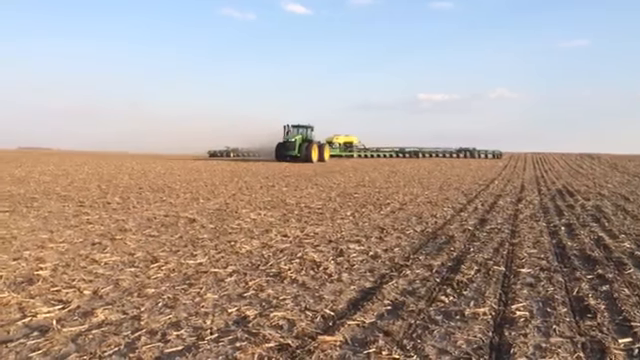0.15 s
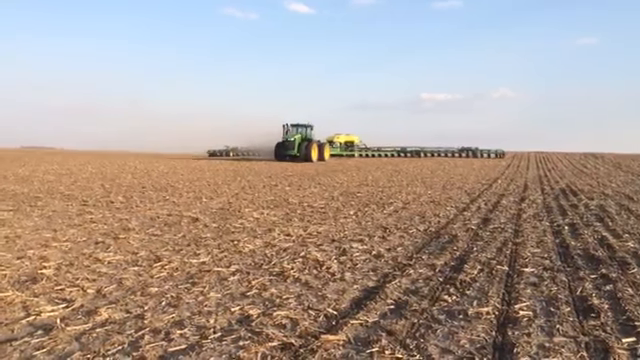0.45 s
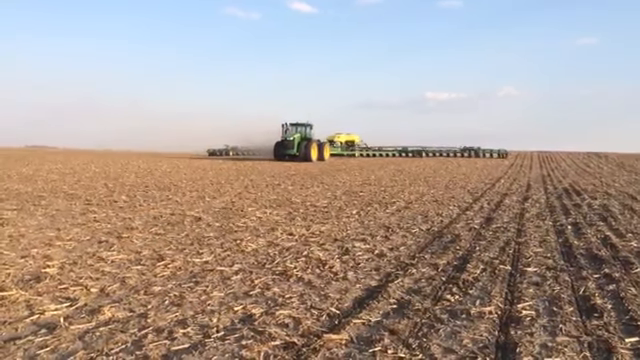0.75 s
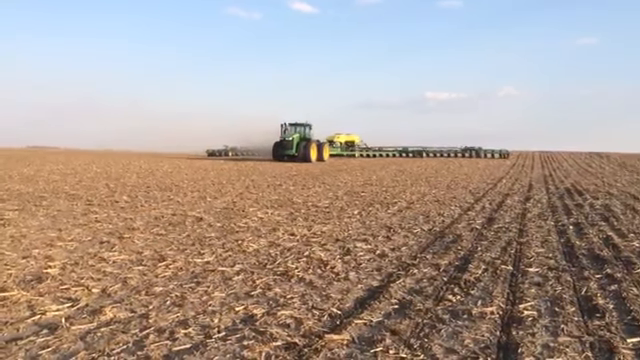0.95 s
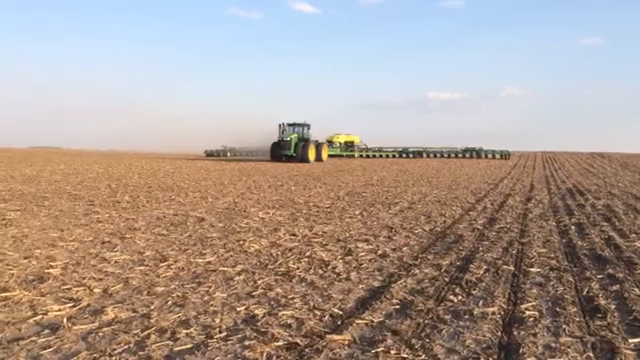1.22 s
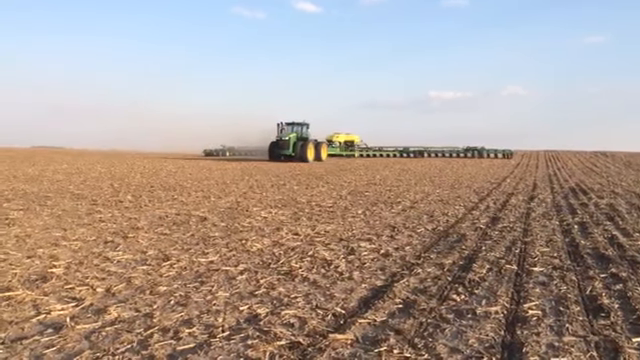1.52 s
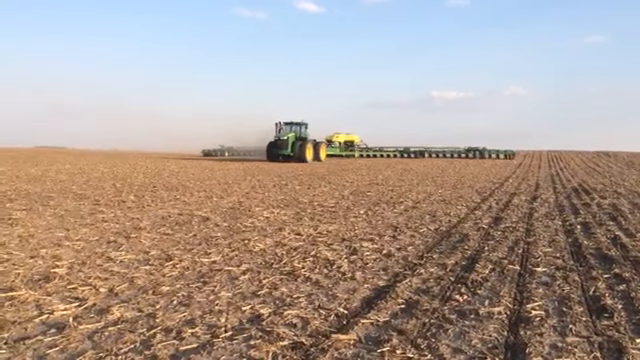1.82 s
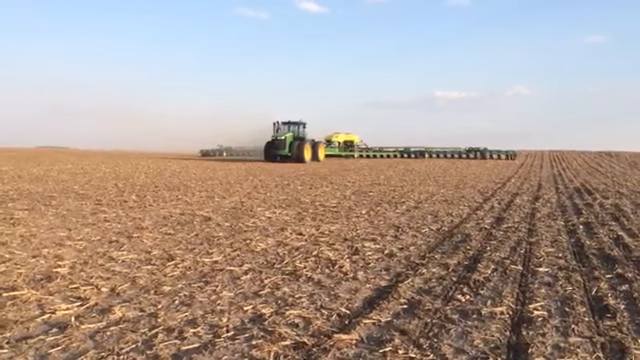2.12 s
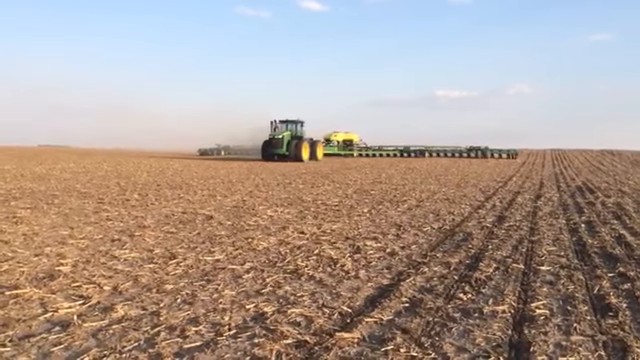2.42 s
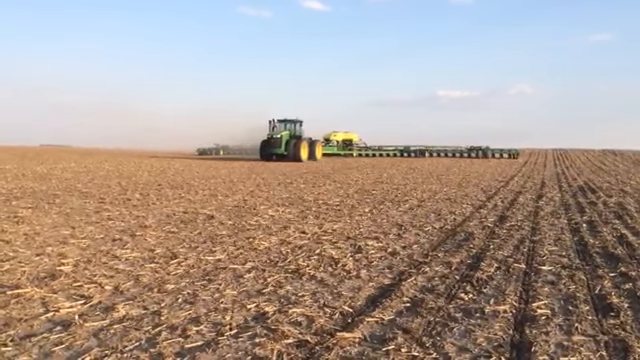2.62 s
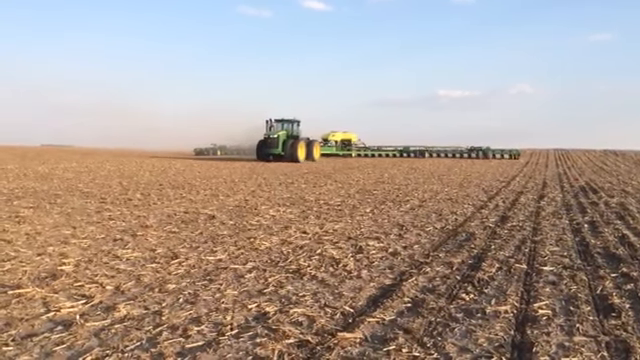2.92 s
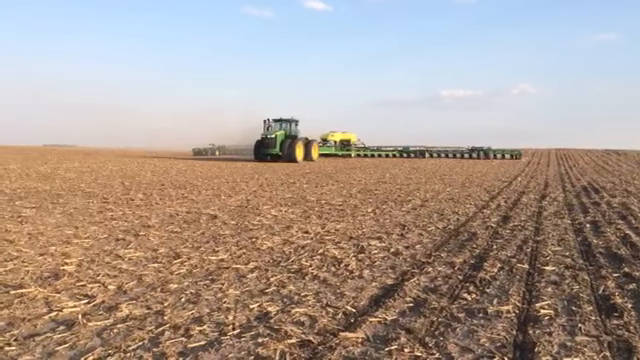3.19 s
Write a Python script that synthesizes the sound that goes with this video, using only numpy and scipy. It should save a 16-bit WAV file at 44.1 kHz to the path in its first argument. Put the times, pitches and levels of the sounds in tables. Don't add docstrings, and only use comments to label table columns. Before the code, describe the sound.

A tractor pulling a planter drones far off over an open field, with a steady mid-pitched whine and hushed roar; close wind thumps and flutters irregularly on a small microphone throughout, with faint squeaks.

```python
import sys
import numpy as np
from scipy import signal
from scipy.io import wavfile
from scipy.ndimage import uniform_filter1d

SR = 44100
rng = np.random.default_rng(int(sys.argv[2]) if len(sys.argv) > 2 else 0)


def output_pcm(signal):
    pcm = np.clip(np.atleast_2d(signal).T, -1, 1) * 32767
    wavfile.write(sys.argv[1], SR, np.round(pcm).astype(np.int16))


def linear_from_db(decibels):
    return 10 ** (np.asarray(decibels, float) / 20)


N = 147735

# [f/Hz, density/dB per Hz]
ROAR = [(300, -10), (750, -1), (1400, -3), (2400, -12.5), (3500, -15.5), (6300, -24), (11200, -40.5),
        (12400, -46.5)]
# [t/s, level/dB]
NEARNESS = [(0, -48), (.7, -46.5), (1.1, -47.5), (2.05, -45.5), (2.35, -47), (2.8, -44), (3.35, -46)]
# [f/Hz, share]
SOIL_ECHO = [(490, 0.41), (1500, 0.16), (2620, 0.66), (4800, 0.16), (10000, 0.098)]
ROAR_DB, NEAR_REF_DB, TREBLE_HZ = -35, -44, 3800
NOTCH_HZ, NOTCH_SPACING_HZ = 2632, 2230

# [f/Hz, width/Hz, level/dB]
GEAR_TONES = [(932, 10, -54), (1030, 8, -51), (1084, 8, -51), (1226, 12, -53), (1395, 25, -50),
              (1868, 12, -59), (4660, 35, -70), (5131, 40, -67), (5600, 65, -69), (1340, 160, -48),
              (2150, 200, -54), (2400, 130, -60), (3200, 300, -58)]
# [t/s, level/dB]
FAN_LOAD = [(0, -52), (.2, -55), (1.15, -56), (1.3, -51), (1.6, -50), (2.0, -54), (2.12, -47.5),
            (2.9, -50.5), (3.35, -53)]
FAN_HZ, FAN_WIDTH_HZ = 2028, 14

# [t/s, peak level/dB, f/Hz]
SQUEAKS = [(.205, -45, 5120), (.235, -43, 5160), (.36, -43, 5110), (.595, -40, 5150), (.62, -42, 5600),
           (.79, -47, 5130), (1.165, -43, 5130), (1.23, -42, 5130), (1.34, -44, 4650), (1.42, -46, 5900),
           (1.555, -43, 5920), (1.615, -46, 5900), (1.733, -40, 5200), (1.975, -39, 4960),
           (1.98, -39, 5130), (2.025, -40, 5130), (2.045, -40, 5130), (2.12, -41, 5080), (2.215, -49, 5600)]
SQUEAK_S, SQUEAK_DB = .008, -9.5

# [t/s, f/Hz, level/dB]
PUMP = [(0.0, 1429, -41), (0.1, 1432, -39), (.3, 1434, -38), (1.6, 1435, -38), (1.9, 1434.5, -40),
        (2.9, 1435, -39.5), (3.35, 1436, -41)]
# [t/s, depth/dB]
WHINE_FADES = [
    (.265, -12),
    (.69, -20),
    (.87, -10),
    (1.85, -8),
    (2.52, -11),
    (2.83, -9),
    (3.14, -11),
    (3.27, -10),
]
LOW_PARTIAL_DB, THIRD_PARTIAL_DB, PUMP_WAVER_DB = 1.3, -25, .95
FADE_HALF_S = .009

# [t/s, peak level/dB, swirl f/Hz]
THUMPS = [(0.013, -21, 110), (0.078, -21, 88), (0.262, -16.5, 101), (0.367, -16.5, 91.5),
          (0.442, -18, 84.5), (0.496, -19, 102), (0.775, -16, 119), (0.947, -19, 129), (0.965, -18, 130),
          (0.979, -14, 194), (1.256, -20, 148), (1.43, -18, 117), (1.443, -23, 100), (1.656, -18.5, 88),
          (1.67, -24.5, 166), (1.99, -23, 137), (2.035, -18, 201), (2.044, -19, 128), (2.054, -16.5, 193),
          (2.138, -21, 91), (2.188, -19, 100.3), (2.275, -16, 179), (2.453, -20, 95), (2.794, -21, 195),
          (2.876, -23, 126), (2.943, -22.5, 84.4), (2.998, -23, 109.1), (3.12, -11, 149),
          (3.134, -17.5, 90.5), (3.189, -22, 139)]
# [t/s, peak level/dB, swirl f/Hz]
FLUTTERS = [(0.047, -18.5, 410), (0.074, -21.5, 236), (0.412, -19, 295), (0.435, -17, 490),
            (0.437, -17, 227), (0.647, -10, 374), (0.657, -15.5, 337), (0.812, -16.5, 205),
            (0.857, -17.5, 226), (0.864, -16, 467), (0.976, -21.5, 480), (1.014, -18, 377),
            (1.256, -13, 540), (1.352, -20.5, 225), (1.522, -17.5, 218), (1.622, -13, 357),
            (1.668, -16.5, 520), (1.678, -14, 430), (1.747, -18.5, 407), (1.812, -20.5, 292),
            (1.999, -16.5, 445), (2.071, -22, 487), (2.221, -19.5, 355), (2.945, -19.5, 467),
            (3.074, -20.5, 357), (3.117, -19, 390), (3.127, -15.5, 505), (3.132, -19.5, 219)]
# [t/s, peak level/dB, swirl f/Hz]
PUFFS = [(0.535, -19.5, 108), (0.649, -25, 162), (0.723, -18.5, 196), (0.727, -19, 467), (0.742, -27, 200),
         (0.802, -21, 148), (0.84, -29, 149), (0.925, -21.5, 104), (0.98, -16, 390), (1.018, -22.5, 182),
         (1.056, -27, 79), (1.516, -21, 64.6), (1.539, -22, 364), (1.629, -21, 144), (1.673, -24, 444),
         (1.68, -19, 163), (1.751, -23, 175), (1.761, -24, 147), (1.923, -24.5, 136), (2.065, -19, 477),
         (2.139, -22, 336), (2.284, -20.5, 525), (2.316, -24.5, 86), (2.402, -23.5, 76),
         (2.444, -19.5, 377), (2.54, -24, 154), (2.662, -22.5, 576), (2.667, -25.5, 95), (2.708, -21, 125),
         (2.755, -24, 109)]
# [t/s, peak level/dB, swirl f/Hz]
MORE_EDDIES = [(0.159, -23, 119), (0.244, -26, 405), (.41, -21, 585), (0.545, -25, 250), (.659, -17.5, 610),
               (0.706, -25, 370), (0.994, -26, 286), (1.084, -28.5, 222), (1.13, -25.5, 384), (1.284, -24, 160),
               (1.355, -23, 112), (1.47, -21.5, 593), (1.885, -25, 123), (2.207, -24, 83), (2.569, -20.5, 490),
               (2.591, -22, 107), (2.618, -25, 124), (2.99, -21.5, 635), (3.022, -20, 113), (3.303, -32, 276)]
# [t/s, peak level/dB, swirl f/Hz]
ROLLS = [(.533, -27, 70), (.567, -32, 71), (.743, -33, 71), (.945, -26, 70), (1.306, -33.5, 75),
         (1.691, -25, 65.3), (1.751, -23, 70), (2.09, -26, 75.5), (2.251, -39, 70), (2.828, -30, 70),
         (2.865, -26, 75.4), (2.905, -29, 75), (3.288, -30, 81), (.673, -23, 160), (.836, -23, 175),
         (1.882, -27, 160), (2.016, -27, 160), (2.923, -26, 166), (3.247, -24.5, 150)]
# [t/s, peak level/dB, swirl f/Hz]
FLICKS = [(.779, -21.5, 281), (1.258, -22, 850), (2.661, -29, 850), (3.345, -25, 456), (.914, -32, 300),
          (1.095, -30, 335), (1.158, -30, 306), (1.328, -27, 304), (2.341, -27, 324), (2.399, -28, 274),
          (2.49, -25.5, 296), (2.906, -25.5, 258), (3.309, -27, 290), (.077, -27, 480), (.531, -29, 510),
          (1.052, -37, 500), (1.145, -29, 473), (2.607, -24, 450), (2.62, -28.5, 660), (2.659, -25, 624),
          (2.789, -30, 446), (3.196, -26, 450), (3.303, -24.5, 524)]
# [t/s, level/dB]
BREEZE = [(0, -28.5), (.19, -37), (.5, -33.5), (.6, -33.5), (.85, -31.5), (1.1, -32), (1.2, -30.5),
          (1.39, -33.5), (1.5, -31), (1.58, -31.5), (1.7, -31.5), (1.94, -32.5), (2.14, -30), (2.36, -32),
          (2.7, -31.5), (2.84, -30.5), (3.0, -29), (3.35, -34)]
# [swirl f/Hz, level/dB]
SMALL_EDDIES = [(40, -19.5), (70, 3), (110, -1), (180, 2), (300, -5), (450, -3.5), (620, 1)]
# [t/s, depth/dB]
LULLS = [(.135, -3), (.195, -4), (.36, -2), (.6, -6), (.89, 2.5), (1.115, -3), (1.2, -4), (1.385, -5),
         (1.57, -4), (1.845, 0), (2.365, -5.5), (2.48, -5), (2.515, 1.5), (2.68, -2.5), (2.835, -10),
         (3.225, -5.5), (3.265, -4)]
SMALL_DB, SMALL_PER_S, SMALL_SPREAD_DB = 0.5, 520, 1.04
CLUMP_DB, LULL_HALF_S = 0.5, .018
WAKE_S, WAKE_SHARE, CALM_DB = 0.016, 0.24, -34
EDDY_TURNS, QUICK_LONGER = .5, .3
GLIDE = .3

LOW_CUT_HZ, FADE_IN_S = 28, .004


def evened(x):
    return x / np.sqrt(np.mean(x ** 2) + 1e-20)


def read(points, hz):
    f, value = np.transpose(points)
    return np.interp(np.log(hz + 1), np.log(f + 1), value)


def curve(table, t, axis=1):
    columns = np.transpose(table)
    return np.interp(t, columns[0], columns[axis])


def dips(rows, half_s, t):
    return sum(db * np.exp(-.5 * ((t - s) / half_s) ** 2) for s, db in rows)


def wander(t, top_hz):
    coarse = np.linspace(0, t[-1], num=1000)
    rates = np.geomspace(top_hz / 20, top_hz, num=16)
    slow = sum(np.sin(2 * np.pi * (f * coarse + rng.random())) / np.sqrt(f) for f in rates)
    return np.interp(t, coarse, evened(slow))


def swirl(hz, width_s, turn, glide=0.):
    t = np.arange(-2048, 2049) / SR
    bell = np.exp(-.5 * (t / width_s) ** 2)
    turns = hz * t * (1 + .5 * glide * t / width_s) + turn
    return bell * np.cos(2 * np.pi * turns)


def scatter(rows, width_of, glide=0.):
    out = np.zeros(N + 4097)
    for s, db, hz in rows:
        turn, slide = rng.random(2)
        at = round(s * SR)
        out[at:at + 4097] += linear_from_db(db) * swirl(hz, width_of(hz), turn, glide * (2 * slide - 1))
    return out[2048:2048 + N]


def roar():
    frames, hz = N // 128 + 5, np.fft.rfftfreq(512, 1 / SR)
    t = np.arange(frames) * 128 / SR
    real, imaginary, patches = rng.standard_normal((frames, len(hz), 3)).T
    patches = uniform_filter1d(patches, size=6, axis=0)
    patches = evened(uniform_filter1d(patches, size=24, axis=1))
    treble = (hz / (hz + TREBLE_HZ))[:, None]
    nearness_db = 2.1 * (curve(NEARNESS, t) - NEAR_REF_DB)
    flicker_db = 0.5 * wander(t, 40)
    field_db = read(ROAR, hz)[:, None] + 1.16 * patches + treble * (nearness_db + flicker_db)
    notch_hz = NOTCH_HZ * (1 + 0.01 * wander(t, 1.8))
    share = np.clip(read(SOIL_ECHO, hz), 0, 1)[:, None]
    comb = 1 - share * np.exp(-2j * np.pi * (hz[:, None] - notch_hz) / NOTCH_SPACING_HZ)
    spectrum = (real + 1j * imaginary) * linear_from_db(field_db) * comb
    noise = signal.istft(spectrum, nperseg=512, noverlap=384)[1][:N]
    return linear_from_db(ROAR_DB) * evened(noise)


def gears():
    t, out = np.arange(N) / SR, np.zeros(N)
    fan = (FAN_HZ, FAN_WIDTH_HZ, curve(FAN_LOAD, t))
    for hz, width, db in [*GEAR_TONES, fan]:
        pole = np.exp(-np.pi * width / SR)
        fuzz = rng.standard_normal((N, 2)) @ [1, 1j]
        for _ in range(2):
            fuzz = signal.lfilter([1], [1, -pole], fuzz)
        tone = (fuzz * np.exp(2j * np.pi * hz * t)).real
        out += linear_from_db(db + 1.3 * wander(t, 3.1)) * evened(tone)
    return out


def squeaks():
    rows = [(s + SQUEAK_S, db, hz) for s, db, hz in SQUEAKS]
    return linear_from_db(SQUEAK_DB) * scatter(rows, lambda hz: SQUEAK_S)


def pump():
    t = np.arange(N) / SR
    half_phase = np.pi * np.cumsum(curve(PUMP, t)) / SR
    load_db = curve(PUMP, t, axis=2)
    partials_db = (LOW_PARTIAL_DB, dips(WHINE_FADES, FADE_HALF_S, t), THIRD_PARTIAL_DB)
    out = np.zeros(N)
    for k, db in enumerate(partials_db, start=1):
        level = linear_from_db(load_db + db + k * PUMP_WAVER_DB * wander(t, 20))
        out += level * np.sin(k * (half_phase + .2 * wander(t, 15)))
    return np.sqrt(2) * out


def eddy_s(hz):
    return EDDY_TURNS * (hz / 100) ** QUICK_LONGER / hz


def small_eddies():
    strength = linear_from_db(SMALL_SPREAD_DB * np.minimum(rng.exponential(1, N), 4))
    hits = strength * (rng.random(N) < SMALL_PER_S / SR)
    sizes = np.geomspace(35, 640, num=24)
    kind, out = rng.integers(0, len(sizes), N), np.zeros(N)
    for k, hz in enumerate(sizes):
        shape = linear_from_db(read(SMALL_EDDIES, hz)) * np.sqrt(hz) * swirl(hz, 0.61 / hz, rng.random())
        out += signal.oaconvolve(hits * (kind == k), shape, "same")
    return evened(out)


def wind():
    big = sum(scatter(rows, eddy_s, GLIDE) for rows in (THUMPS, FLUTTERS, PUFFS, MORE_EDDIES, ROLLS, FLICKS))
    t, span = np.arange(N) / SR, round(WAKE_S * SR)
    power = uniform_filter1d(uniform_filter1d(big ** 2, span), span)
    wake_db = 10 * np.log10(abs(power) + linear_from_db(2 * CALM_DB))
    gust_db = curve(BREEZE, t) + WAKE_SHARE * (wake_db - wake_db.mean())
    gust_db += CLUMP_DB * wander(t, 25.4) + dips(LULLS, LULL_HALF_S, t)
    return big + linear_from_db(SMALL_DB + gust_db) * small_eddies()


def scene():
    return (roar() + gears() + squeaks() + pump() + wind())[None]


def top_cut(x):
    return signal.sosfilt(signal.butter(12, 15010, fs=SR, output="sos"), x)


def record(dry):
    cut = signal.lfilter(*signal.butter(2, LOW_CUT_HZ, "high", fs=SR), dry)
    fade_in = np.minimum(np.arange(N) / SR / FADE_IN_S, 1)
    return top_cut(cut * fade_in)


dry = scene()
out = record(dry)
output_pcm(out)
```